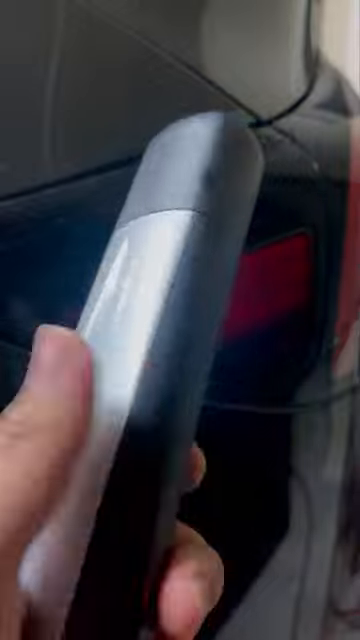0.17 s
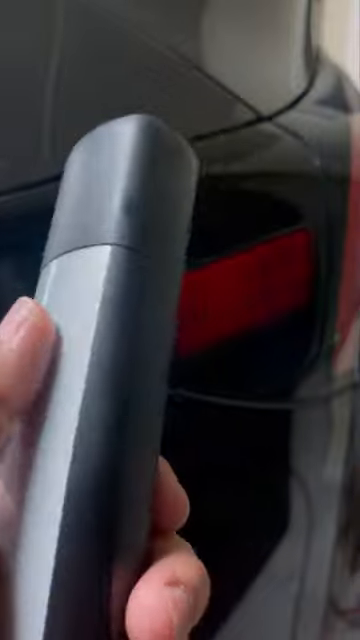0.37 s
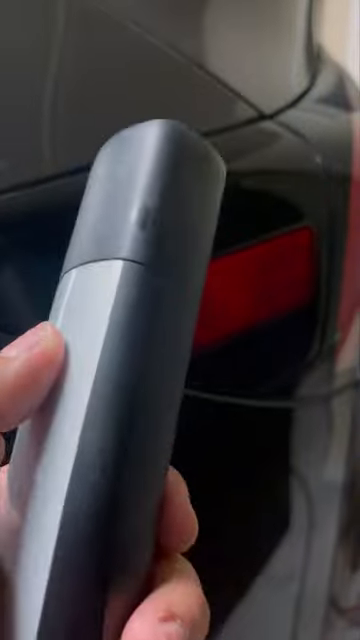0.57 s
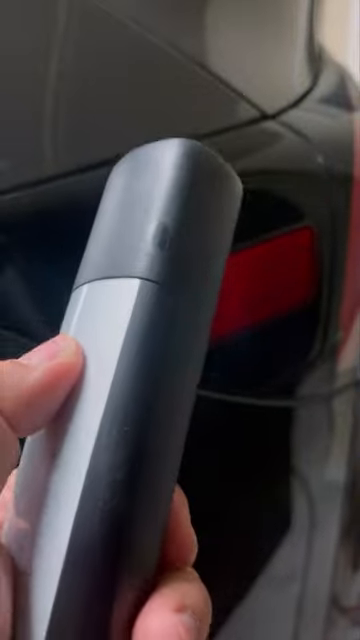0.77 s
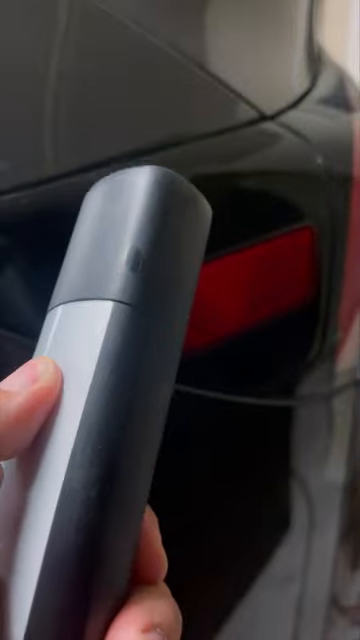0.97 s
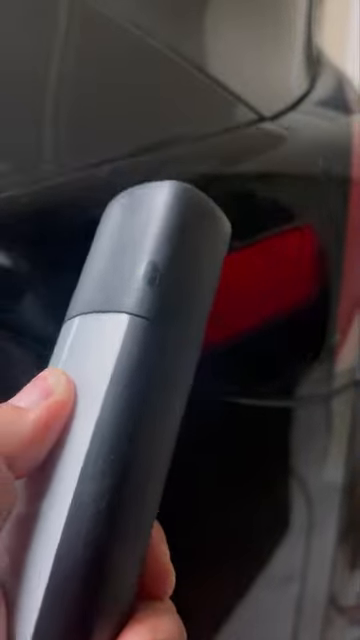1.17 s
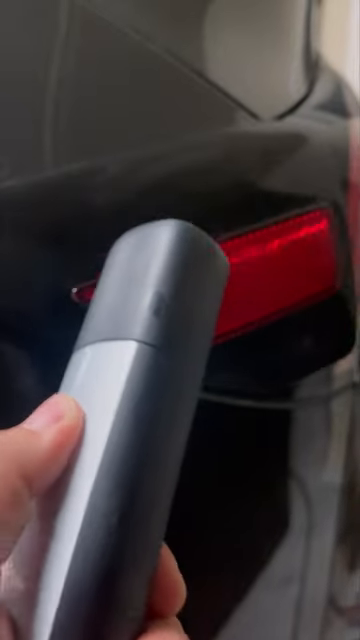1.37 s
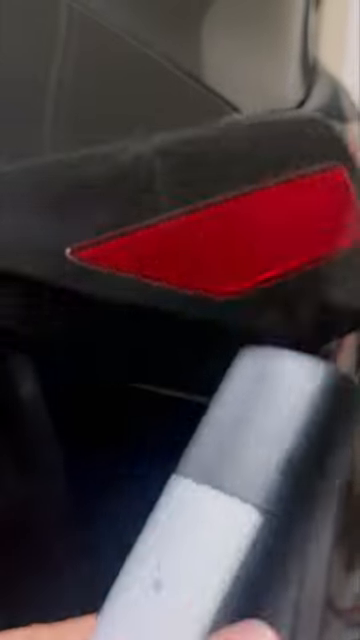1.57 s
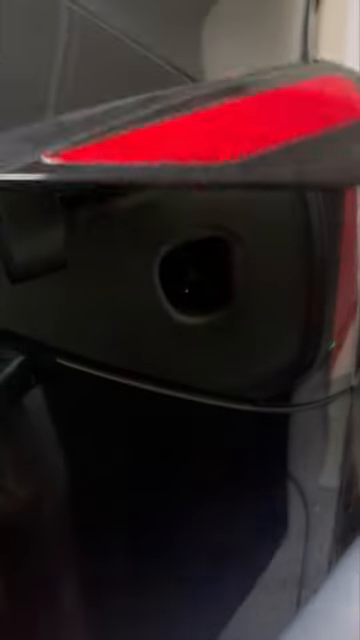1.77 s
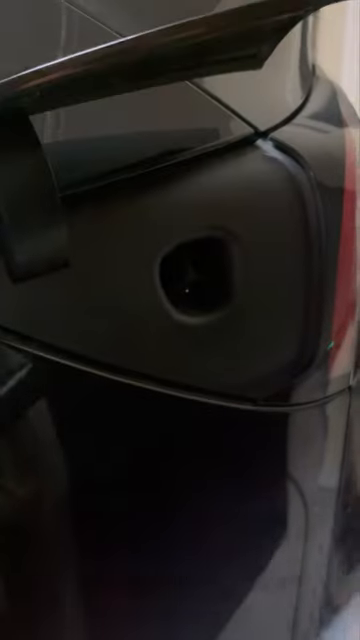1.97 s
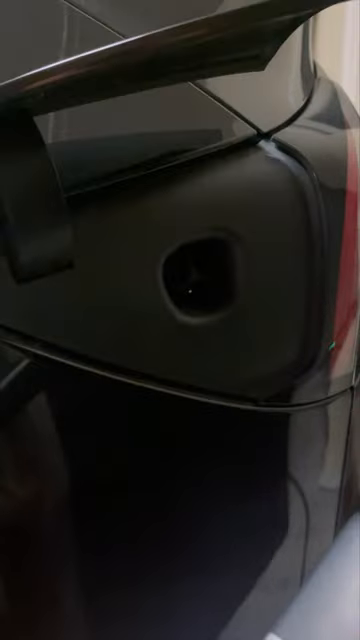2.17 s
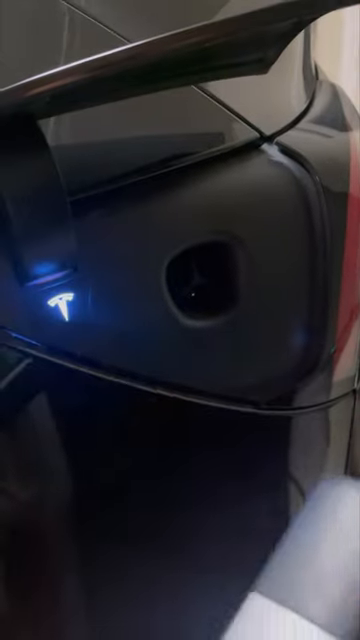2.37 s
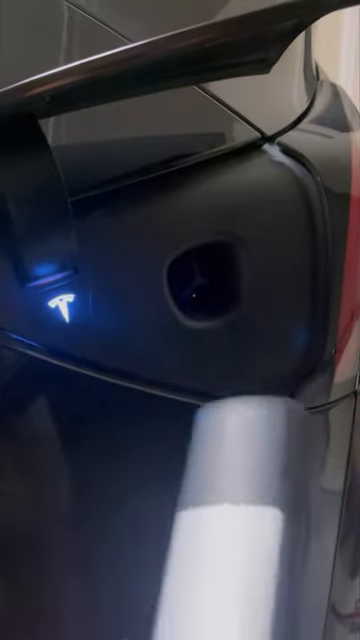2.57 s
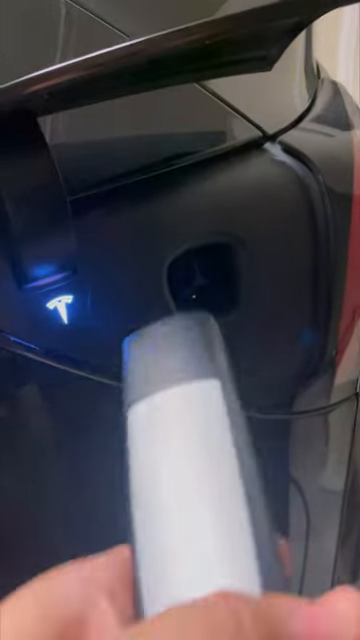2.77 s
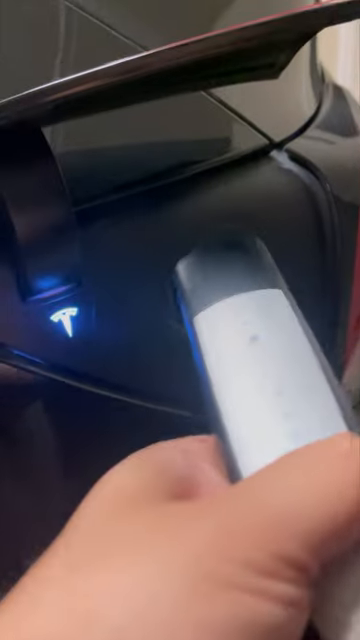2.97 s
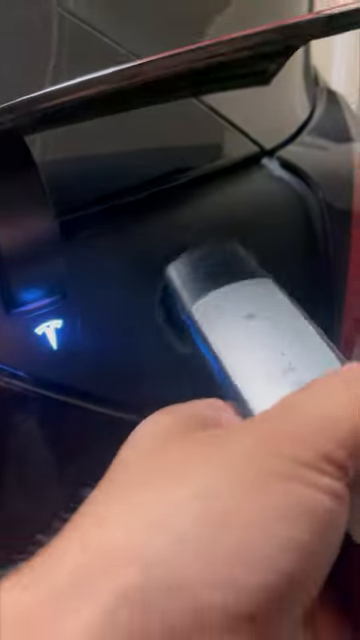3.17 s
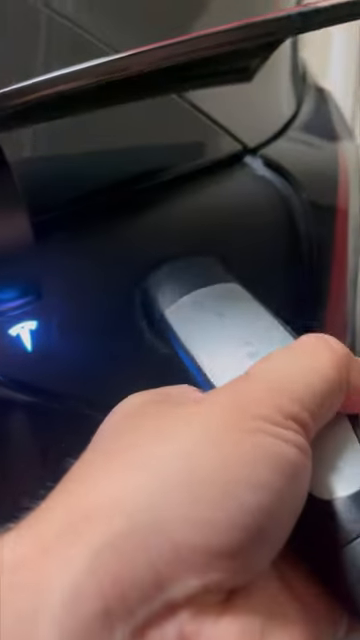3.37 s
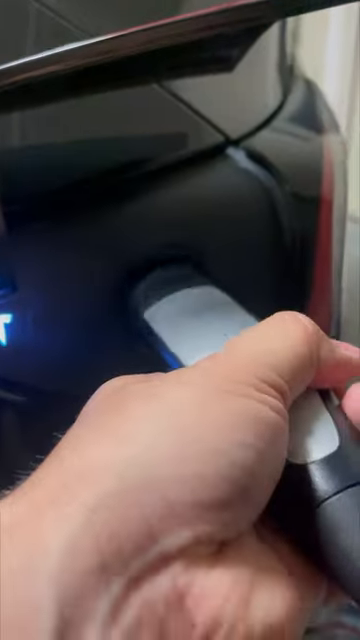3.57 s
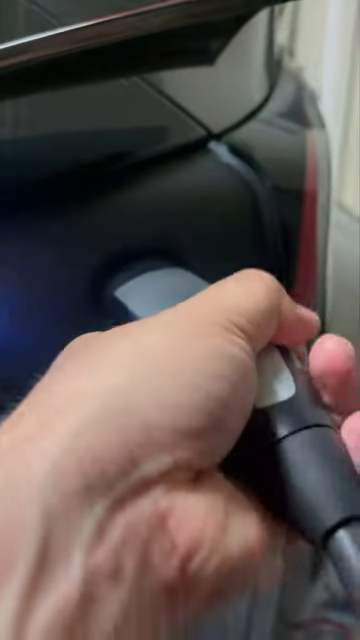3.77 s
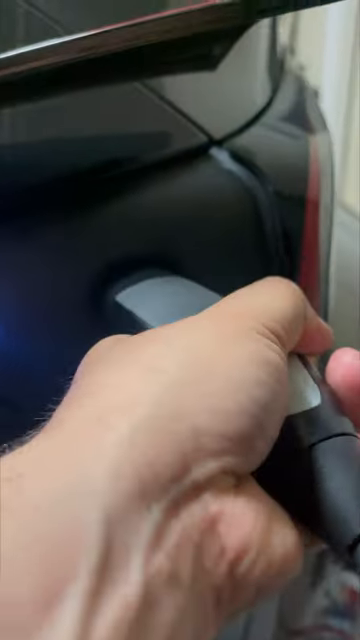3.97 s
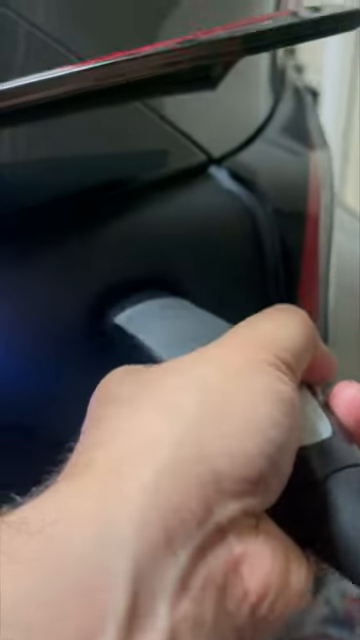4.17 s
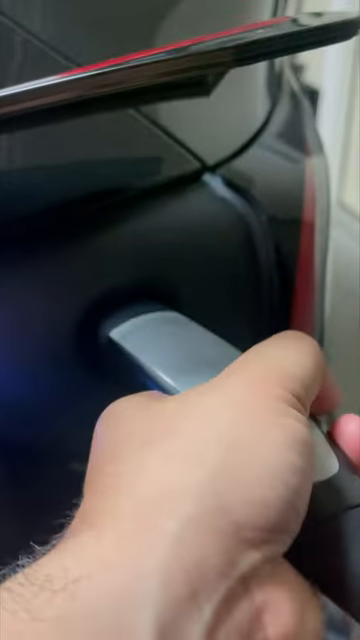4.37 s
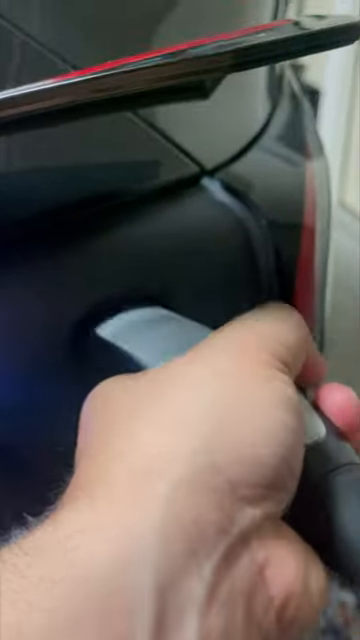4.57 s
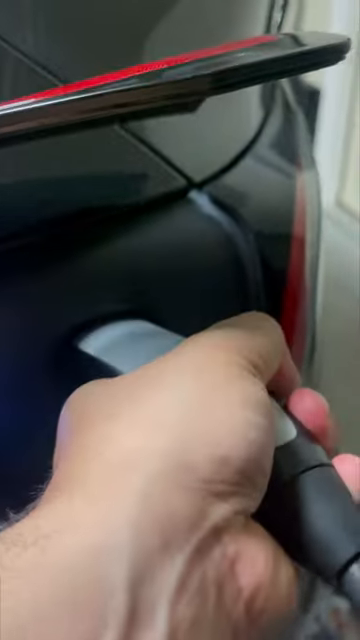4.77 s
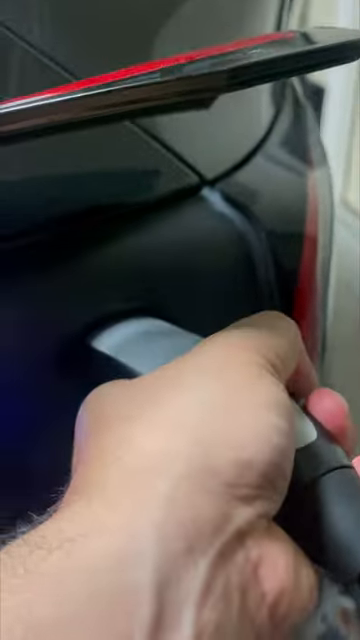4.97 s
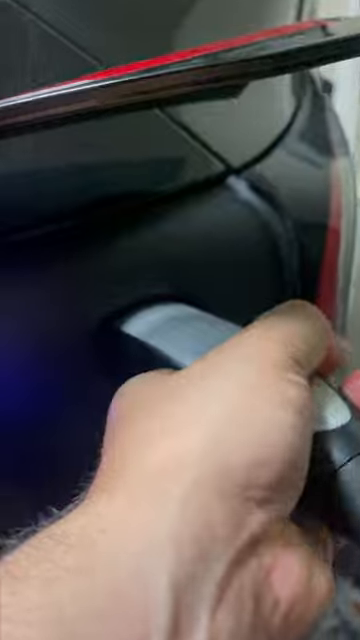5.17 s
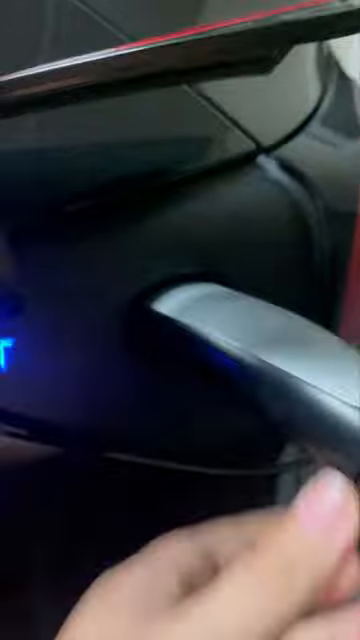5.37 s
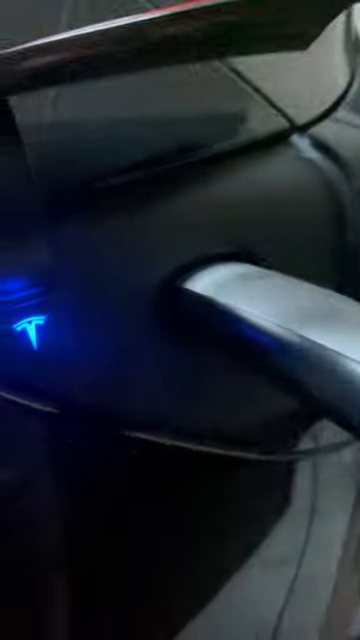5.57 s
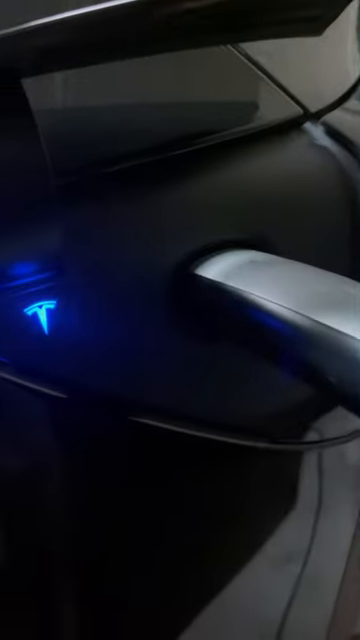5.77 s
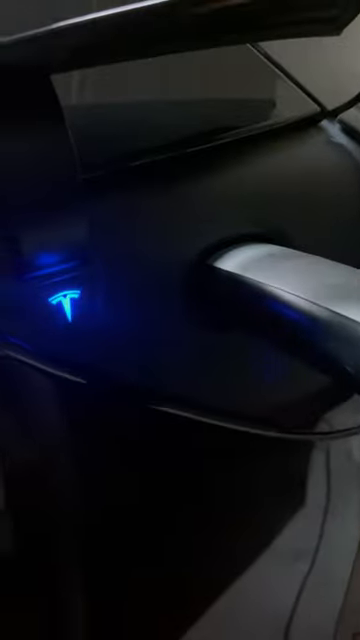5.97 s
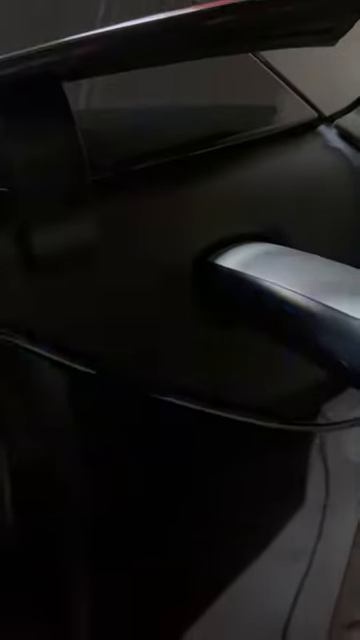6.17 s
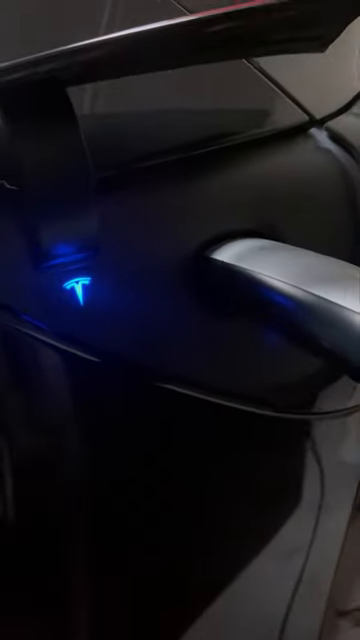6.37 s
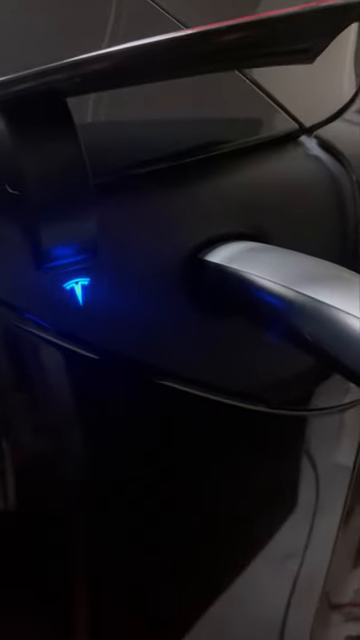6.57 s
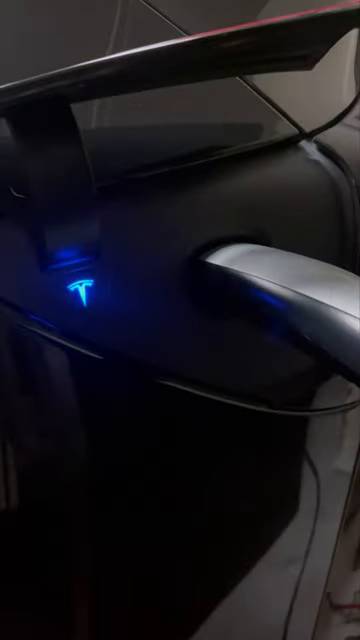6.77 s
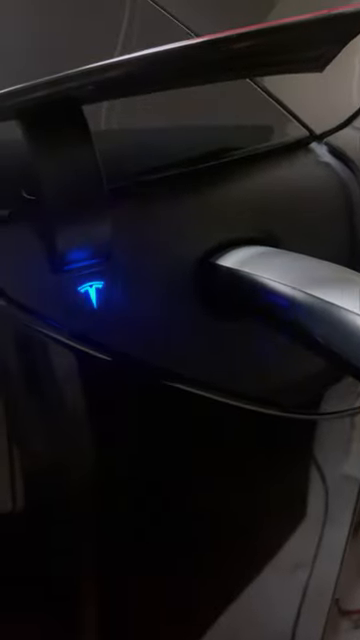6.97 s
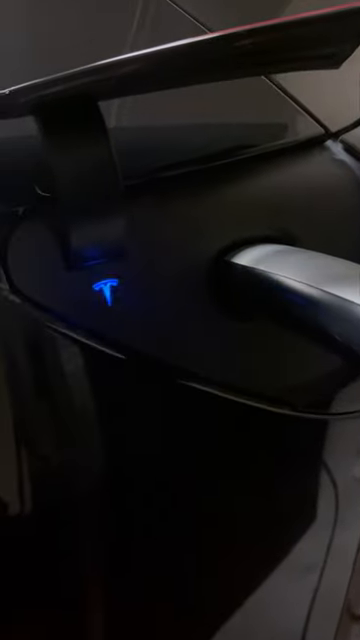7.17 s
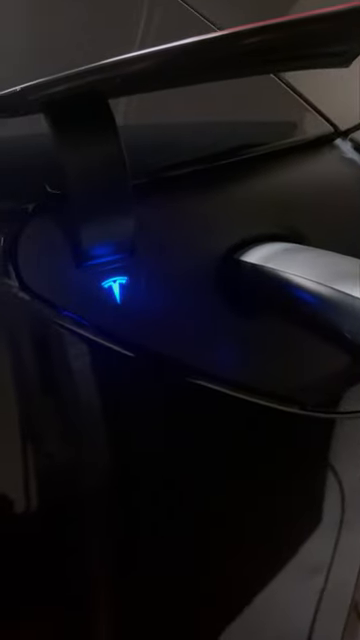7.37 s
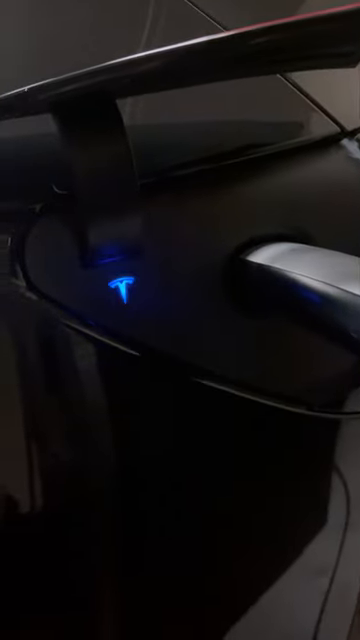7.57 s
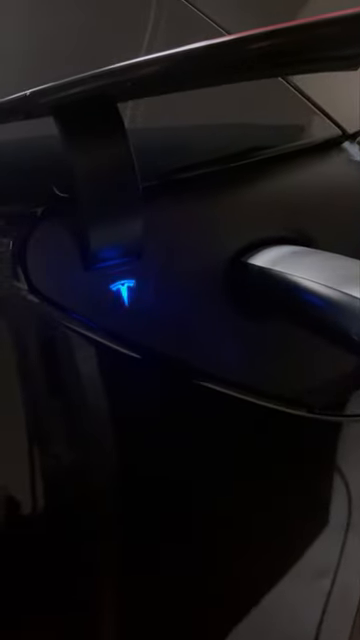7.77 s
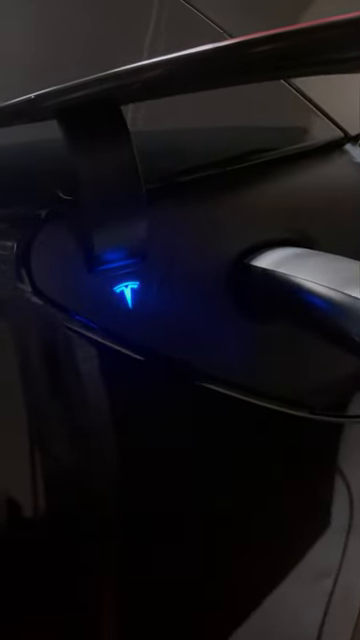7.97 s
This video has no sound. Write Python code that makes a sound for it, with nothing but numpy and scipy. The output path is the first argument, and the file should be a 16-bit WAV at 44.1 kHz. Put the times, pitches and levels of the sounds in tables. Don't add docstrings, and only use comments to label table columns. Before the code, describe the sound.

Dry plastic clicks and a short geared whirr, then a plug knocks, slides and thuds home in hollow sheet metal over low fan hum.

```python
import sys
import numpy as np
from scipy import signal
from scipy.fft import rfft, irfft, next_fast_len
from scipy.io import wavfile
from scipy.ndimage import uniform_filter1d

SR = 44100
rng = np.random.default_rng(int(sys.argv[2]) if len(sys.argv) > 2 else 0)


def to_wav(sig):
    pcm = np.clip(np.atleast_2d(sig), -1, 1) * 32767
    pcm = np.round(pcm).astype(np.int16)
    wavfile.write(sys.argv[1], SR, pcm.T)


def field_ratio(decibels):
    return 10 ** (np.asarray(decibels, dtype=float) / 20)


N = 353549
T = np.arange(N) / SR
M = next_fast_len(N)
F = np.maximum(np.arange(M // 2 + 1) * SR / M, 1)
CHANGE_S = 5.826
TICK_T60_S = 0.0035
# f/Hz, width/Hz, level/dB
CONTACT_GLINT = [(10600, 1200, -1)]


def curve(rows, col, off=-120):
    rows = np.array(rows)
    return np.interp(T, rows[:, 0], rows[:, col], left=off, right=off)


def over_hz(table):
    hz, value = np.transpose(table)
    return np.interp(np.log(F), np.log(np.maximum(hz, 1)), value)


def band(x, lo_hz, hi_hz):
    return signal.sosfilt(signal.butter(2, [lo_hz, hi_hz], "band", fs=SR, output="sos"), x)


def unit(x):
    return x / np.sqrt(np.mean(x ** 2))


def ring(x, hz, t60):
    pole = np.exp((2j * np.pi * hz - np.log(1000) / t60) / SR)
    return signal.lfilter([1], [1, -pole], x).imag


def body(x, peaks):
    out = 0
    for hz, width, db in peaks:
        t60 = np.log(1000) / np.pi / width
        out = out + field_ratio(db) * 2 * np.pi * width / SR * ring(x, hz, t60)
    return out


def walk(rate):
    hold = int(SR / rate)
    steps = np.repeat(rng.standard_normal(N // hold + 1), hold)
    return unit(uniform_filter1d(steps, hold)[:N])


def swell(peak_s, db, rise_s, fall_s):
    away = np.maximum((peak_s - T) / rise_s, (T - peak_s) / fall_s)
    return field_ratio(db - 30 * away)


def clicks(contacts, t60, crackle, damp, glint, ring_db=7):
    # f/Hz, width/Hz, level/dB
    plastic = [(538, 250, 3), (883, 83, 4), (1274, 94, 3), (1770, 240, -5.5), (2280, 67, -8.5),
               (2926, 130, -8.5), (3404, 170, -26), (4460, 780, -14)]
    out, t = np.zeros((2, N)), T[:4000]
    for s, peak_db, top_db, low_db, ring_hz, pan_db in contacts:
        tail = rng.standard_normal(len(t)) * np.exp(-np.log(1000) * t / t60)
        burst = (t == 0) + crackle * tail
        spot = rng.standard_normal((len(plastic), 2))
        modes = [(hz * (1 + .06 * a), width * damp, db + 2.5 * b)
                 for (hz, width, db), (a, b) in zip(plastic, spot)]
        modes.append((ring_hz, 0.13 * damp * ring_hz, ring_db))
        shell = body(burst, modes) + 0.12 * burst
        middle = band(shell, 1500, 5000)
        top = .5 * band(burst, 4500, 8800) + body(burst, glint)
        low = band(shell, 650, 1500)
        hit = 0
        for part, db in [(middle, 0), (top, top_db), (low, low_db + 0.5)]:
            hit = hit + field_ratio(peak_db + db) * part / np.abs(part).max()
        out[:, int(s * SR):][:, :len(t)] += hit * field_ratio(np.array([[pan_db], [-pan_db]]) / 2)
    return out


def air():
    # f/Hz, density/dB per Hz
    early = [(15, -45.5), (25, -17.5), (53, -2.5), (90, -8), (108, -14), (193, -2.5), (220, -11.5),
             (371, -10.5), (696, -26.5), (1530, -39.5), (2320, -38.5), (2580, -30.5), (2940, -48),
             (10900, -56.5), (13100, -67.5)]
    late = [(15, -56), (25, -4.5), (55, -4.5), (95, -9.5), (198, -1.5), (244, -15.5), (371, -10.5),
            (412, -20), (446, -18), (678, -29), (1610, -43), (2090, -42.5), (2510, -36), (3620, -57),
            (13100, -63.5)]
    # f/Hz, width/Hz, early lift/dB, late lift/dB
    hum = [(53.7, 25, 5.5, 0), (114, 13, 9.5, 1.5), (157.1, 14, 13.5, 6.5), (198, 15, 5, 2.5),
           (215, 3, 11.5, -2), (298, 18, 7, 7), (363, 29, 6, 2), (633, 46, 8, 6.5), (1554, 430, 16, 16.5),
           (2550, 32, 9, 14.5), (3080, 23, 17, 3.5)]
    # f/Hz, side minus mid/dB
    spread = [(60, -18), (110, -27), (200, -16), (360, -9.5), (650, 2), (1170, -1), (2120, -3), (3850, 9),
              (6970, -1.5), (12600, 5)]
    mid, side = rfft(rng.standard_normal((2, M)))
    side = side * field_ratio(over_hz(spread))
    takes = []
    for k, (shape, db) in enumerate([(early, -48.5), (late, -49)]):
        lift = sum(row[2 + k] / (1 + (2 * (F - row[0]) / row[1]) ** 2) for row in hum)
        m, s = irfft(np.array([mid, side]) * field_ratio(over_hz(shape) + lift), M)[:, :N]
        takes.append(np.array([m + s, m - s]) * field_ratio(db) / np.std(m))
    drift_db = 0.36 * walk(3.5) + np.array([[.3], [-.3]])
    return np.where(T < CHANGE_S, *takes) * field_ratio(drift_db)


def mains():
    # f/Hz, level/dB
    lines = [(118.4, -56), (161.5, -57), (188.4, -55.5)]
    out = 0
    for hz, db in lines:
        sway = field_ratio(db - 3.5 + 0.77 * walk(1.6))
        out = out + sway * np.sqrt(2) * np.sin(2 * np.pi * hz * T)
    return out * (T < CHANGE_S)


def rub():
    # t/s of peak, hiss/dB, rise/s, fall/s, scrape minus hiss/dB
    skin = [
        (0.085, -64, .06, .14, -2),
        (0.345, -55.5, .18, .06, -8),
        (0.625, -75, .02, .14, -8),
        (0.902, -77, .01, .2, -8),
        (1.355, -70, .015, .45, 0),
        (1.54, -77, .3, .2, 0),
        (2.518, -71.5, .12, .35, 2),
        (5.21, -69, .02, .15, 8),
    ]
    plug = [(1.114, -53.5, .015, 0.093, 7.5), (1.17, -68, .02, 0.14, 9), (2.828, -52.5, 0.23, 0.22, 1),
            (3.466, -49, 0.007, 0.015, 16), (3.522, -58.5, 0.041, .13, 14), (3.7, -47, 0.091, 0.032, 13),
            (3.72, -63, .02, 0.29, -10), (3.985, -63.5, 0.025, 0.033, 3), (4.5, -68.5, 0.026, 0.057, 17),
            (4.574, -51, 0.081, 0.075, 7), (4.65, -40, 0.078, 0.042, 12),
            (4.792, -37.5, 0.023, 0.013, 11.5), (4.81, -66, 0.018, .2, -5), (5.274, -77, 0.14, 1, 15.5),
            (5.814, -74, .06, .02, 0), (5.85, -69.5, 0.034, 0.11, 11.5), (7.184, -54.5, 0.034, 0.12, -0.5),
            (7.408, -56.5, 0.046, 0.11, 2)]
    gears = [
        (1.156, -41, 0.045, 0.022, 6.5),
        (1.24, -85, 0.18, 1, 23),
        (1.87, -60, 0.57, 0.15, 14.5),
        (1.999, -64, 0.036, 0.024, 17),
        (2.222, -57.5, 0.035, 0.064, 27.2),
        (2.252, -52, .05, 0.024, 15),
        (2.342, -68, 0.04, 0.034, 29.4),
        (4.775, -57, 0.12, .04, 12),
        (4.95, -83.5, 0.34, 0.21, 23.4),
    ]
    # f/Hz, width/Hz, level/dB
    slide = [(3600, 600, -3), (4600, 900, -4), (5700, 700, 0), (7600, 2000, 0)]
    # f/Hz, width/Hz, level/dB
    handle = [(2100, 500, -2), (2600, 500, 0), (3400, 700, -3)]
    grain = field_ratio(1.2 * walk(90) + 2.2 * walk(500))
    hiss, scrape, sheen = rng.standard_normal((3, N)) * grain
    hiss = unit(band(band(body(hiss, slide), 2800, 10000), 2000, 10000))
    scrape = unit(band(band(scrape, 800, 3200), 800, 3200))
    sheen = unit(band(band(sheen, 9700, 11500), 9700, 11500) + .45 * band(sheen, 7000, 8800))
    power = field_ratio(-92.5 + np.array([[0], [5], [-10]])) ** 2 * (T < 7.2)
    for strokes, sheen_db in [(skin, 7.5), (plug, -8.5), (gears, -29)]:
        for *shape, scrape_db in strokes:
            balance_db = np.array([[0], [scrape_db - 9.0], [sheen_db]])
            power += swell(*shape) ** 2 * field_ratio(balance_db) ** 2
    swish = unit(body(rng.standard_normal(N) * grain, handle))
    swish = swish * swell(peak_s=2.83, db=-52, rise_s=.22, fall_s=.22)
    return np.sum(np.sqrt(power) * [hiss, scrape, sheen], axis=0) + swish


def button():
    # t/s, peak/dB, top minus peak/dB, low knock minus peak/dB, left minus right/dB
    presses = [
        (0.074, -54, 8, -17, 3),
        (0.1694, -57, -6.5, -9, -1),
        (0.241, -71, 22.5, 2, 16),
        (0.5064, -59, 12, -10, -2.5),
        (0.6619, -59, -12, -12, -3),
        (0.8938, -33.5, 5.5, -15, 3),
        (0.99, -66, 8, -10.5, -7.5),
        (1.3386, -24.5, 4.5, -20, 5.5),
        (1.436, -50, 9.5, -13, 6),
    ]
    # f/Hz, width/Hz, level/dB
    button_glint = [(7700, 1500, 0), (11300, 1700, 7)]
    contacts = [(*row[:4], 3000, row[4]) for row in presses]
    return clicks(contacts, TICK_T60_S, crackle=0.4, damp=2.4, glint=button_glint, ring_db=9)


def locks():
    drives = [
        (1.114, .04, -55.5),
        (2.206, 0.036, -42.5),
        (4.742, .047, -48.5),
    ]
    orders = [(1, 0), (2, -4), (3, -11), (4, -22)]
    start_hz, top_hz = 1195, 1702
    out, wobble = np.zeros(N), 1 + .1 * walk(1500)
    for start_s, length_s, db in drives:
        part = (T - start_s) / length_s
        hz = top_hz - (top_hz - start_hz) * np.exp(-3 * np.clip(part, 0, 1))
        turns = np.cumsum(hz * wobble) / SR
        tone = sum(field_ratio(d + 5 * walk(130)) * np.sin(2 * np.pi * k * turns) for k, d in orders)
        out += field_ratio(db) * tone * np.clip(np.minimum(8 * part, 12 * (1 - part)), 0, 1)
    return out


def knocks():
    # t/s, peak/dB, top minus peak/dB, low knock minus peak/dB, own ring f/Hz
    hits = [(1.1154, -46, -28.5, -12, 2250), (1.1273, -32.5, -31, -5.5, 2320),
            (1.2062, -48, -27, -15, 2230), (1.9909, -47.5, -44, 5, 4130), (2.194, -42, -30, -9, 1300),
            (2.2065, -29, -42, -2.5, 1330), (2.2445, -21.5, -38, -9.5, 1380), (2.264, -38, -40, -2, 1900),
            (2.288, -45.5, -40, -5, 1490), (2.333, -45, -36, -4, 1500), (2.2544, -32, -54.5, 1.5, 2060),
            (2.5894, -60, -10.5, 3, 1530), (3.459, -37.5, -21, 11, 890), (3.515, -41.5, -13, 8.5, 910),
            (3.5887, -50, -23.5, 10, 905), (3.645, -52.5, -20, 11, 900), (3.9838, -39.5, -14, -0.5, 1680),
            (4.0527, -61, -26, -2, 2540), (4.4925, -48, -3.5, 8, 900), (4.533, -55.5, -7, 9, 960),
            (4.553, -47.5, -10, 6.5, 910), (4.596, -48.5, -10, 9.5, 990), (4.612, -45.5, -12.5, 7.5, 850),
            (4.621, -35, -12, 4.5, 1080), (4.6339, -24.5, -40, 2.5, 2400), (4.7416, -35, -45, -2, 2180),
            (4.7884, -32.5, -30, -5.5, 2260), (4.7944, -27.5, -36, -4.5, 1370), (7.1726, -49, 6, -2, 1570),
            (7.3871, -47, 2, -17, 3430), (1.1165, -43, -20, -20, 4300), (1.14, -41, -25, -20, 4400),
            (4.758, -40, -40, -15, 3300)]
    contacts = [(*row, 2) for row in hits]
    return clicks(contacts, t60=0.072, crackle=0.6, damp=0.73, glint=CONTACT_GLINT)


def latch():
    # t/s, peak/dB, top minus peak/dB, low knock minus peak/dB, left minus right/dB
    snaps = [(1.1542, -32.5, -19, -14, 1.5), (2.2052, -34, -35, -9, 7), (2.2425, -37, -32, -11, 4),
             (2.3375, -40, -30, -8, 4), (3.459, -27, -11.5, 1.5, 8), (3.5145, -35, -18, 8, 3),
             (3.529, -52, 4, -10, 0), (3.639, -54, 4, -10, 0), (3.696, -30.5, 7, 2, -3),
             (3.8146, -41.5, -4, -4, -9), (4.6522, -26, 0, 13, 5), (4.7862, -22, -19, -5.5, 6),
             (4.325, -59, 5, -15, 0), (5.135, -54, -6, -15, 0), (5.2116, -50, -16, -20, -10),
             (6.6994, -55, -33.5, 4, 0)]
    contacts = [(*row[:4], 3000, row[4]) for row in snaps]
    return clicks(contacts, TICK_T60_S, crackle=0.46, damp=2.4, glint=CONTACT_GLINT)


def panel():
    # t/s, peak/dB, boom minus peak/dB, upper modes minus peak/dB, main ring f/Hz
    thuds = [(1.161, -34.5, -16, 3.5, 170), (1.186, -33.5, 2, -19.5, 266), (2.214, -36, -31, -3, 154),
             (2.247, -39, -24, 3.5, 166), (3.464, -16, -10, -10.5, 205.4), (3.52, -32.5, 2, 5, 166),
             (3.59, -37.5, -14, 1.5, 223), (3.688, -16, -31, -8, 215), (3.738, -33.5, 1, -2.5, 154),
             (3.911, -31.5, -27, -13, 150), (3.995, -23, -2, -11.5, 205), (4.049, -38, 9.5, -9, 177),
             (4.213, -37.5, -35, -11, 186), (4.499, -20, -10, -28, 208.6), (4.547, -39.5, -12, 3.5, 232),
             (4.589, -29, -3, -9, 225), (4.653, -6.5, -10, -3.5, 232), (4.671, -20, -16, -2.5, 252),
             (4.698, -23, -4, 5, 283), (4.732, -16.5, -3.5, -18, 213), (4.789, -56, 0.5, -43, 170)]
    # f/Hz, level/dB, t60/s, left minus right/dB
    sheet = [(58.2, -5.5, 0.24, 0.5), (70.2, -8.5, 0.29, 0), (122.3, -12, 0.25, 0), (158.7, -9, 0.32, 1),
             (203.6, -2, 0.13, 0.6), (267, 1, 0.11, 2), (302.6, 1, 0.057, 0), (331.5, -18, 0.39, 4.5),
             (386, -6, 0.11, 1), (470, -8, 0.13, -1.5), (522.7, -12.5, 0.13, 9.5), (582, -17, 0.15, 8.5),
             (686, -19.5, 0.19, 12.5), (807, -25, 0.16, 28), (860, -24, 0.086, 15.5),
             (1000, -23, 0.084, 11.5)]
    # peak t/s, level/dB, rise/s, fall/s
    forcing = [
        (1.159, -20.5, 0.1, 0.18),
        (2.28, -30, 0.14, 0.35),
        (3.5, -23.5, 0.045, 0.57),
        (3.62, -31, 0.13, 0.65),
        (3.695, -17.5, 0.08, 0.25),
        (3.99, -28.5, 0.2, 0.15),
        (4.506, -25.5, 0.059, 1),
        (4.66, -13.5, 0.11, 0.22),
        (4.76, -23, 0.31, 0.2),
    ]
    hz, mode_db, t60, pan_db = np.transpose(sheet)
    index = np.arange(len(hz))
    drive, main, t = np.zeros((len(hz), N)), np.zeros(N), T[:6000]
    bloom = t / 0.0055 * np.exp(1 - t / 0.0055)
    for s, peak_db, boom_db, upper_db, ring_hz in thuds:
        tilt_db = np.where(hz < 100, boom_db, np.where(hz > 240, upper_db, 0))
        reach_db = peak_db - 2.5 + tilt_db + 0.81 * rng.standard_normal(len(hz))
        late = (s * SR + .6 * SR / hz).astype(int)
        drive[index, late] += field_ratio(reach_db) * (-1) ** index
        main[int(s * SR):][:len(t)] += field_ratio(peak_db - 5.0) * bloom * np.sin(2 * np.pi * ring_hz * t)
    drive = uniform_filter1d(drive, size=24)
    force = np.sqrt(sum(swell(*row) ** 2 for row in forcing))
    drive += field_ratio(-43.5) * force * rng.standard_normal(N) * (hz[:, None] > 100)
    out = main * field_ratio(np.array([[.35], [-.35]]))
    for x, f, db, decay_s, pan in zip(drive, hz, mode_db, t60, pan_db):
        out = out + field_ratio(db + np.array([[pan], [-pan]]) / 2) * ring(x, f, decay_s)
    return out


def strain():
    heaves = [
        (1.22, -56.5, .08, 0.089),
        (1.29, -60.5, 0.091, .12),
        (1.325, -55.5, 0.068, .1),
    ]
    # f/Hz, width/Hz, level/dB
    hinge = [(1595, 90, -4), (2170, 86, 1), (2300, 120, 4), (2490, 122, -4)]
    chatter = rng.standard_normal(N) * field_ratio(4 * walk(220))
    return unit(body(chatter, hinge)) * np.sqrt(sum(swell(*row) ** 2 for row in heaves))


def motor():
    # t/s, tooth rate f/Hz, load level/dB
    run = [
        (1.255, 228.2, -66.5),
        (1.55, 234.3, -55.5),
        (1.64, 243.9, -54),
        (1.7, 260.4, -52.5),
        (1.75, 287.6, -55.5),
        (1.82, 296.8, -55),
        (1.915, 306.5, -53),
        (1.945, 298, -73),
    ]
    # f/Hz, width/Hz, level/dB
    flap = [(800, 130, -1), (920, 90, -5), (1190, 130, 0), (1420, 200, -6), (1820, 160, -2),
            (1980, 140, -1), (2350, 160, -1), (2620, 180, -3), (3000, 200, -10), (4700, 1300, -15)]
    orders = [(3, -1), (4, 3), (6, -9), (8, -1), (9, -9)]
    labouring = T < 1.64
    unsteady = 1 + .012 * walk(60) + .02 * walk(250) * labouring
    rate_hz = uniform_filter1d(curve(run, 1, off=270), size=2500)
    turns = np.cumsum(rate_hz * unsteady) / SR
    tooth = np.diff(np.floor(turns), prepend=0)
    size = field_ratio(3.2 * rng.standard_normal(N)) * (1 + .12 * (-1) ** np.floor(turns))
    whine = unit(body(band(tooth * size, 600, 3300), flap))
    rough = rng.standard_normal(N) * (1 + .5 * np.sin(2 * np.pi * turns))
    grind = unit(band(body(rough, flap), 550, 7000))
    sing = sum(field_ratio(db + 3.5 * walk(22)) * np.sin(2 * np.pi * k * turns) for k, db in orders)
    sing_db = 2.5 + .14 * (curve(run, 1) - run[-1][1])
    return field_ratio(curve(run, 2)) * (field_ratio(sing_db) * unit(body(sing, flap)) + field_ratio(-2.5) * whine + grind)


def relays():
    # t/s, level/dB
    closings = [
        (7.176, -56),
        (7.392, -60.5),
    ]
    # f/Hz, width/Hz, level/dB
    metal = [(3400, 200, -3), (6000, 160, -1), (6650, 98, -2), (5600, 200, -3), (4530, 120, -12),
             (7900, 80, -11)]
    frame = unit(body(rng.standard_normal(N), metal))
    return frame * sum(swell(s, db, rise_s=0.015, fall_s=0.15) for s, db in closings)


def ports(near):
    # f/Hz, left lead/rad
    lead = [(0, 0), (600, .6), (1120, -.8), (1500, -.2), (2700, 1), (3700, .8), (4600, 1.7), (4950, 4.6),
            (5770, 6.2), (8350, 8.8), (9300, 9.4), (10200, 10.3), (11700, 12.4), (12800, 12.6)]
    half_turn = np.exp(.5j * np.interp(F, *np.transpose(lead)))
    return irfft(rfft(near, M) * np.array([half_turn, half_turn.conj()]), M)[:, :N]


def room(x):
    t60_s, level_db, dull_hz = 0.35, -14.5, 5000
    t = T[:int(.6 * SR)]
    tail = rng.standard_normal((2, len(t))) * np.exp(-np.log(1000) * t / t60_s) * (t > .004)
    tail = signal.lfilter(*signal.butter(2, dull_hz, fs=SR), tail)
    tail = tail / np.sqrt(np.sum(tail[0] ** 2))
    return field_ratio(level_db) * signal.fftconvolve(x[None], tail, axes=1)[:, :N]


def scene():
    near = button() + latch() + knocks() + rub() + motor() + locks() + relays() + strain()
    return ports(near) + room(near.mean(axis=0)) + panel() + air() + mains()


def band_limit(x):
    return signal.sosfilt(signal.butter(12, 14200, fs=SR, output="sos"), x)


def record(dry):
    low_hz, high_hz = 8600, 9850
    both = rfft(dry, M)
    notch = np.exp(-((F - (low_hz + high_hz) / 2) / (high_hz - low_hz) * 1.6) ** 4)
    both = both - .85 * both.mean(axis=0) * notch
    both = both / np.sqrt(1 + (38 / F) ** 6)
    top_cut = signal.butter(9, 12800, fs=SR, output="sos")
    mix = signal.sosfilt(top_cut, irfft(both, M)[:, :N])
    gap = np.clip(np.abs(T - CHANGE_S) / 0.0054 - .5, 0, 1)
    return band_limit(mix * gap)


dry = scene()
out = record(dry)
to_wav(out)
```